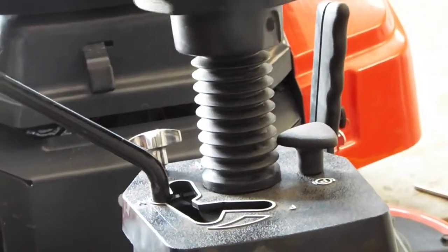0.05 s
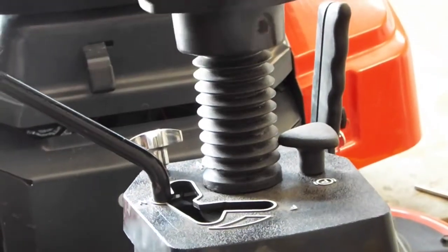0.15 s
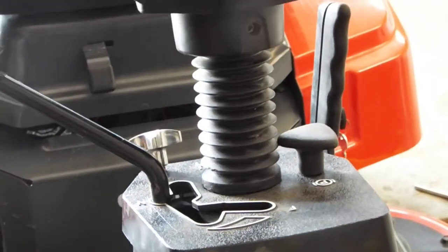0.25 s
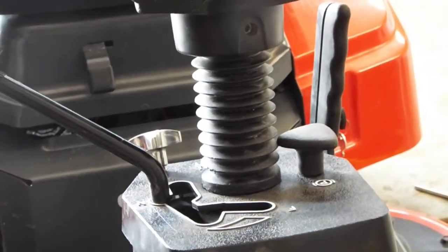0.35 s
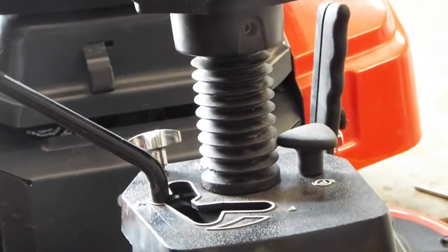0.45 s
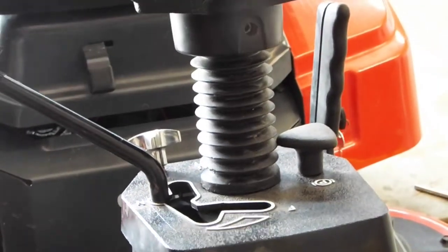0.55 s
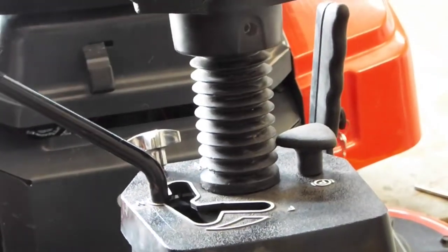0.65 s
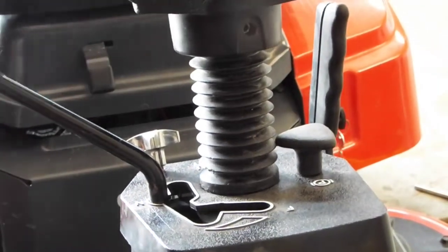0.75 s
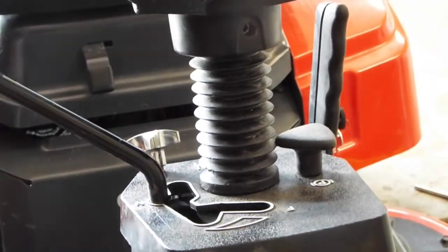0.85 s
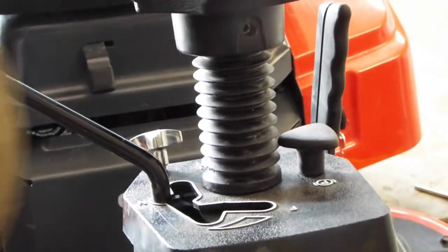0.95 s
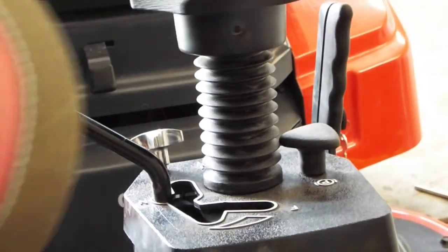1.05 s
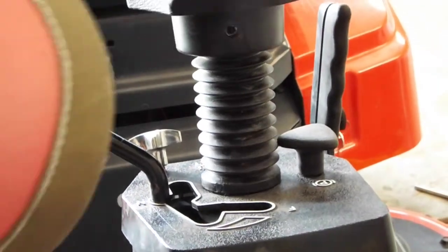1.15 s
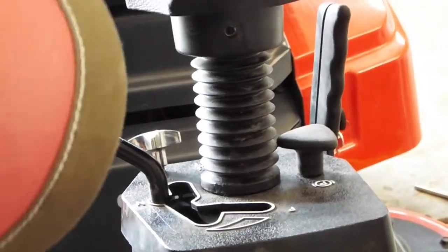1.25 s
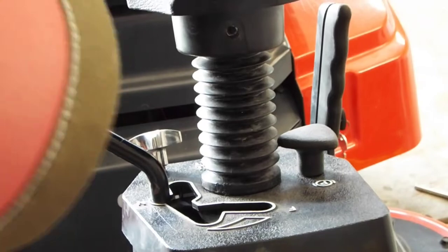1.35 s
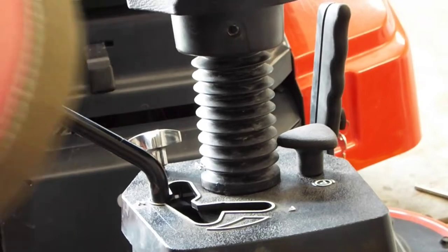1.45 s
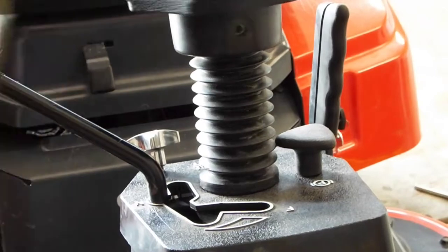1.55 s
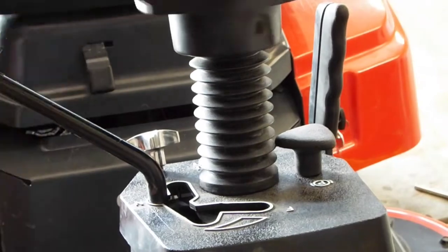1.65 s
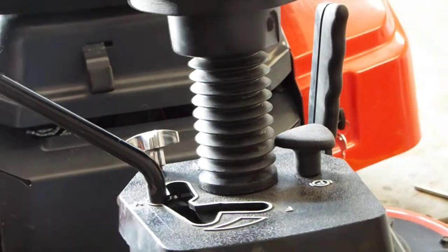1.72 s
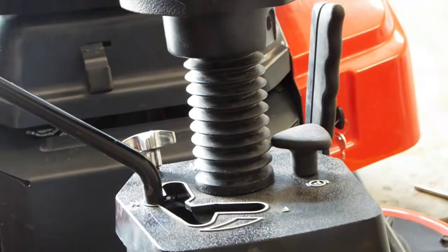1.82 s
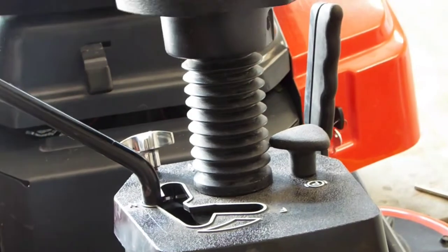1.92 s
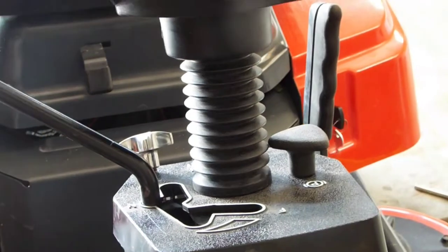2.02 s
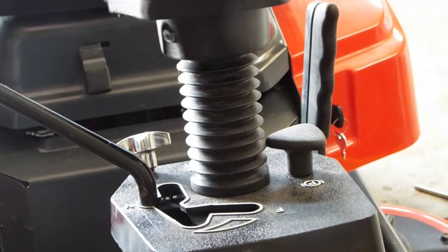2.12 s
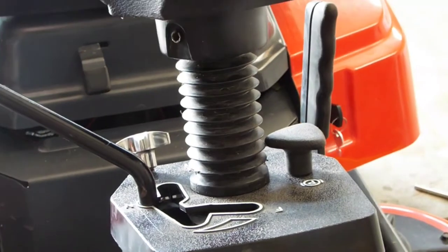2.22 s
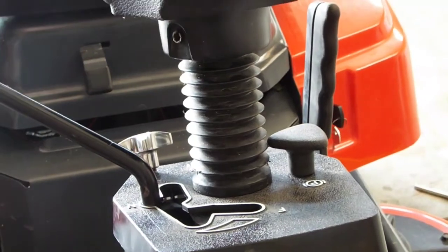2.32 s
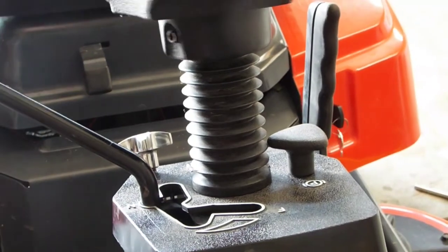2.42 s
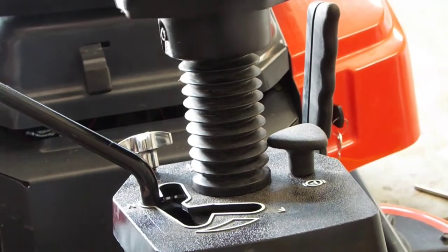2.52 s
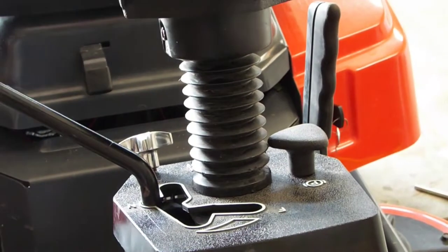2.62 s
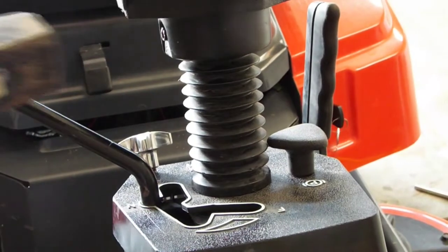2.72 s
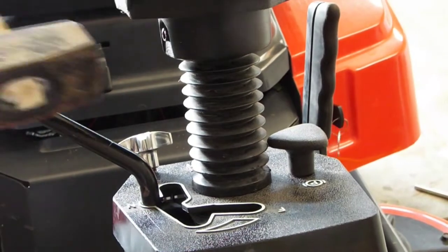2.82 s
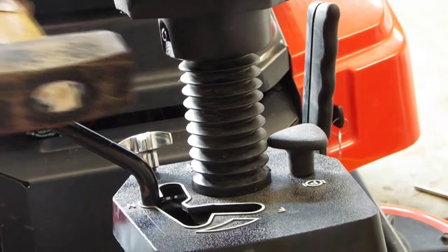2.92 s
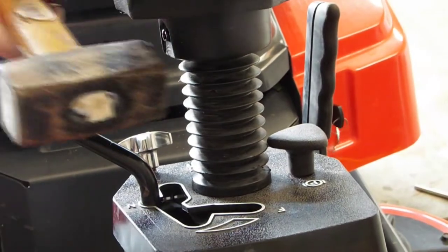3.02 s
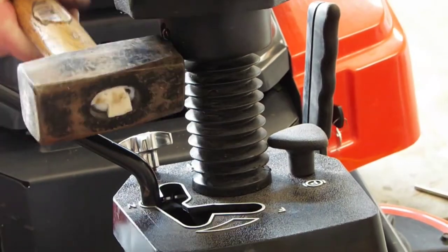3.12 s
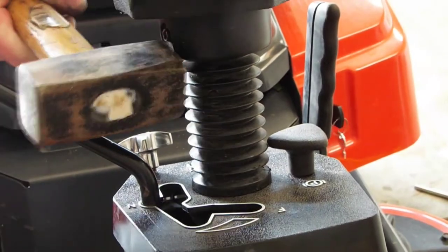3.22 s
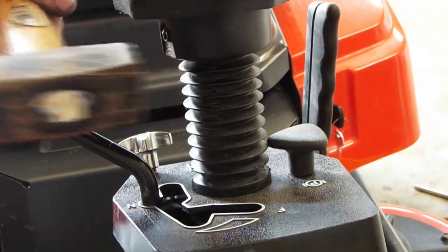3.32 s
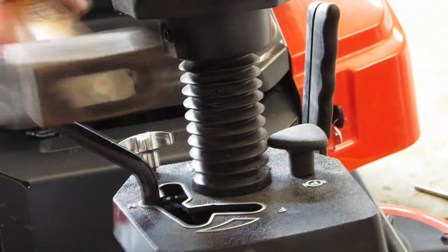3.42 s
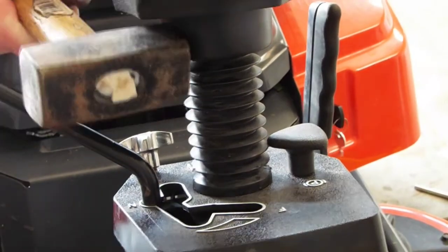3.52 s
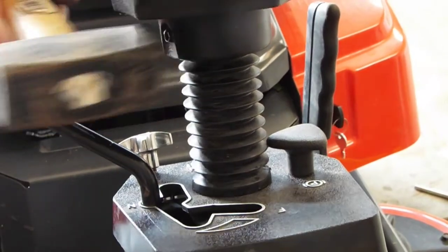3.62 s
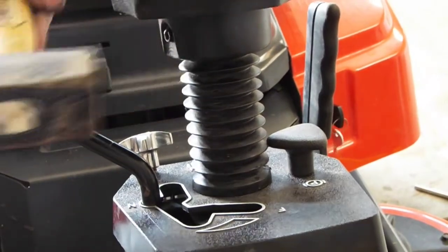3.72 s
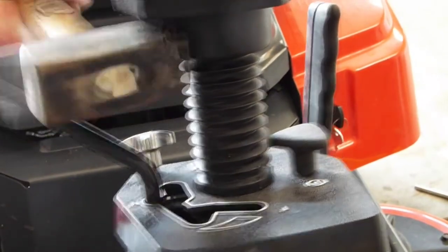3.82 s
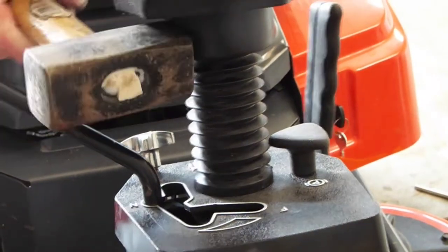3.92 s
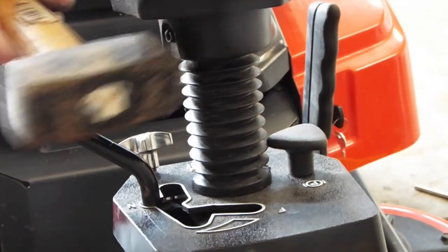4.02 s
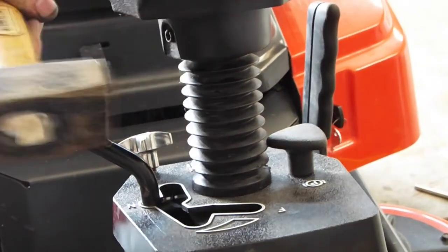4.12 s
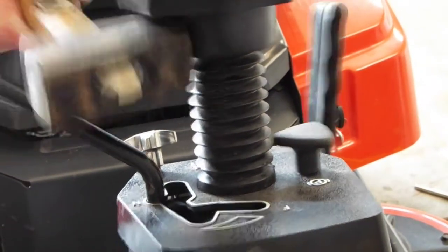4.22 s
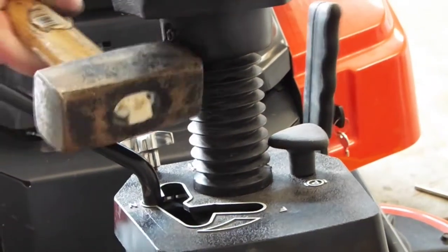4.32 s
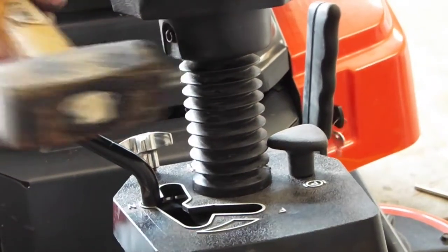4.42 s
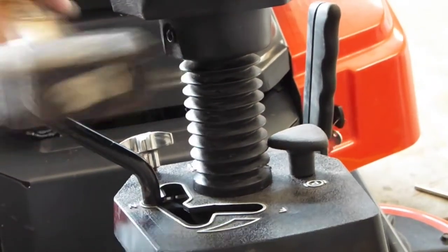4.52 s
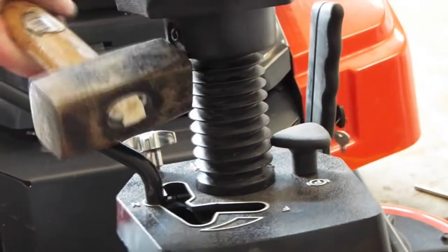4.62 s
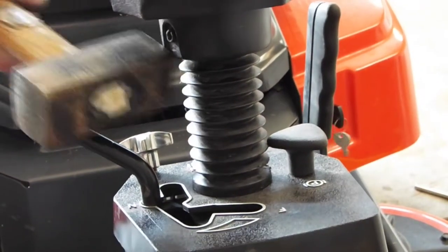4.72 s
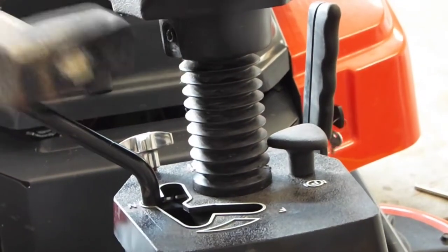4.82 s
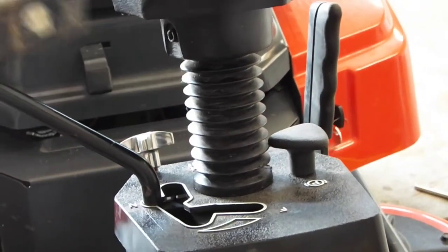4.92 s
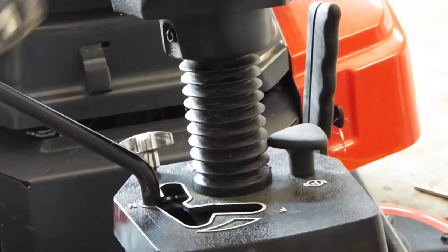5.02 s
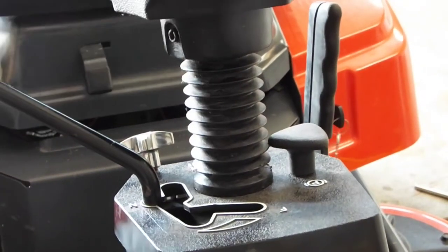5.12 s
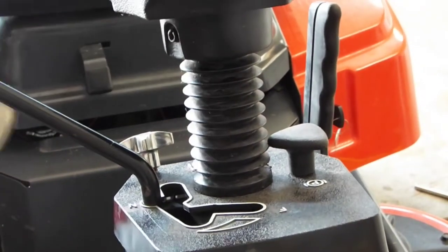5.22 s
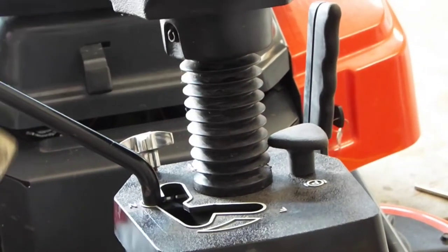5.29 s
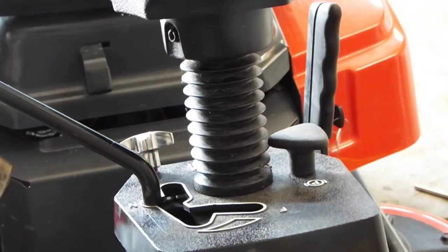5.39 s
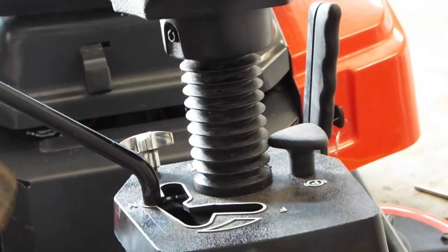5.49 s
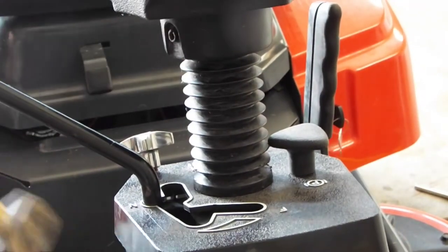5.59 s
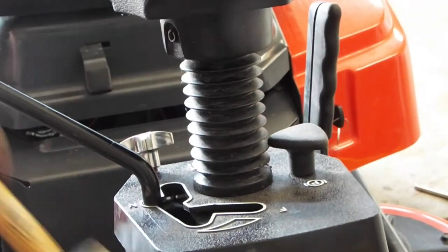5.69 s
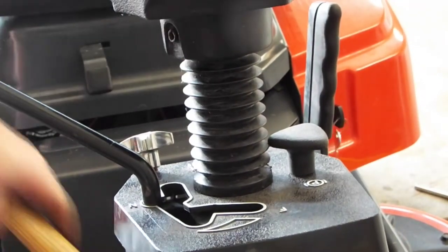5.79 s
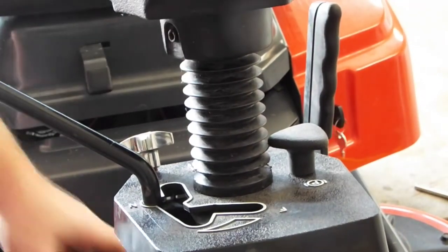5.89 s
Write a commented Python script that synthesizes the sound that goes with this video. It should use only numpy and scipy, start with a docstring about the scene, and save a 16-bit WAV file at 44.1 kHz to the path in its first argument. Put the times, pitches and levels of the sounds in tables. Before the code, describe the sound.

Quiet scraping, dull knocks and light metal clinks come from a machine shaft being turned into place. After one lighter tap, a hammer hits a steel pin four times in quick, regular succession, each sharp clang distorting the close microphone before the garage's echo swells back. The hammer bounces once more and is put away with a soft rustle while a far bird chirps faintly.

```python
"""In a bare, echoing garage, a machine's upright shaft is turned into place: friction hisses, the
shaft knocks against its stops and its loose collar clinks. A hammer is picked up and gives one trial tap
to a steel pin in the collar. Four hard blows drive the pin through, each exciting the modes of hammer,
pin and frame and overloading the close microphone, whose limiter ducks and lets the room's ring swell
back. The hammer rebounds once and is put away while a far bird chirps faintly."""
import sys
import numpy as np
from scipy import signal
from scipy.fft import rfft, irfft, next_fast_len
from scipy.io import wavfile

SR = 44100
rng = np.random.default_rng(int(sys.argv[2]) if len(sys.argv) > 2 else 0)


def wav_record(signal):
    """Record a signal, one row per channel, as 16-bit PCM in the file named by sys.argv[1]."""
    frames = np.transpose(np.atleast_2d(signal))
    bounded = np.clip(frames, -1, 1)
    # unit amplitude maps onto the largest positive 16-bit level
    quanta = np.round(bounded * 32767).astype(np.int16)
    wavfile.write(sys.argv[1], SR, quanta)


N = 262395
TIME = np.arange(N) / SR
CUTOFF_HZ = 15500


def from_db(db):
    """Amplitude ratio of a level in decibels."""
    return 10 ** (np.asarray(db) / 20)


def at_hz(points, hz):
    """Interpolation of a table along log frequency."""
    f, value = np.transpose(points)
    return np.interp(np.log(np.maximum(hz, 1)), np.log(f), value)


def add(track, s, sound):
    """Superposition: a sound joins the track at s seconds."""
    at = int(s * SR)
    track[..., at:at + sound.shape[-1]] += sound[..., :N - at]


def coloured(x, spectrum, keep_power=True):
    """Minimum-phase filtering: folding the cepstrum gives a causal response with the given spectrum."""
    size = 2 * next_fast_len(x.shape[-1] // 2 + 4096)
    gain = from_db(at_hz(spectrum, np.arange(size // 2 + 1) * SR / size))
    if keep_power:
        gain = gain / np.sqrt(np.mean(gain ** 2))
    cepstrum = irfft(np.log(gain))[:size // 2]
    cepstrum[1:] *= 2
    return irfft(rfft(x, size) * np.exp(rfft(cepstrum, size)))[..., :x.shape[-1]]


def soften(x, cut_hz):
    """Low-pass filtering, as in an impact: a longer contact passes less treble."""
    return signal.sosfilt(signal.butter(2, min(cut_hz, .45 * SR), fs=SR, output="sos"), x + 1e-18)


def ring(modes, spread_db, detune=0):
    """Free vibration: damped modes share unit energy a little differently at every strike."""
    t, out = TIME[:SR], 0
    for k, (hz, db, t60) in enumerate(modes):
        luck, bend = rng.standard_normal(2)
        fade = from_db(db + spread_db * luck - np.minimum(60 * t / t60, 200)) / np.sqrt(t60)
        out = out + (-1) ** k * fade * np.sin(2 * np.pi * hz * (1 + detune * bend) * t)
    return out / np.linalg.norm(out)


def contact(rattle_db, rattle_s):
    """Impulsive excitation of unit energy: a click, then the brief chatter of loose parts."""
    chatter = rng.standard_normal(SR) * np.exp(-np.minimum(TIME[:SR] / rattle_s, 20))
    out = from_db(rattle_db) * chatter / np.linalg.norm(chatter)
    out[0] += 1
    return out / np.linalg.norm(out)


def stereo_noise(count, width):
    """Spatial coherence: noise at two close ports is alike in the bass and parts in the treble."""
    mid, side = rng.standard_normal((2, count))
    return mid + coloured(side, width, keep_power=False) * np.array([[1], [-1]])


def air():
    """Ambient noise: a quiet, steady rumble of air."""
    # Each row: frequency in Hz, level in dB.
    spectrum = [(12, -26), (20, 4.5), (49, -6.5), (93, -0.5), (145, -9), (197, -10.5), (227, -14),
                (496, -18), (539, -19), (655, -15.5), (1840, -26.5), (3600, -31.5), (4140, -29),
                (5170, -34), (15800, -41.5)]
    # Each row: frequency in Hz, side against mid in dB.
    width = [(60, -14.5), (110, -14), (200, -13.5), (380, -10), (700, -14), (1290, -14.5), (2380, -8.5),
             (4400, -5.5), (8120, -2), (15000, -4)]
    return from_db(-47) * coloured(stereo_noise(N, width), spectrum)


def garage(build_s):
    """Diffuse reverberation: reflections off hard walls build up, then each band dies at its own rate."""
    # Each row: frequency in Hz, reverberation time in seconds.
    decay_times = [(100, 0.59), (260, 0.78), (700, 0.6), (1800, 0.66), (4800, 0.66), (8000, 0.62),
                   (12000, 0.3), (16000, 0.42)]
    # Each row: frequency in Hz, side against mid in dB.
    width = [(30, -24.5), (60, -12.5), (130, -43), (350, -61), (700, -45.5), (1400, -24), (2800, -17.5),
             (5600, -12), (10000, -6), (15000, -5.5)]
    size = 3 * SR // 2
    t, hz = TIME[:size], np.arange(size // 2 + 1) * SR / size
    noise = rfft(stereo_noise(size, width))
    centres = np.geomspace(100, CUTOFF_HZ, 12)
    echo = 0
    for centre, only in zip(centres, np.eye(len(centres))):
        band = irfft(noise * at_hz(np.c_[centres, only], hz), size)
        echo = echo + band * from_db(-60 * t / at_hz(decay_times, centre))
    echo = echo * (1 - np.exp(-t / build_s))
    return echo / np.linalg.norm(echo[0])


def echoed(sound):
    """Convolution with the garage's impulse response; each call takes other paths between the walls."""
    return signal.fftconvolve(sound[None], garage(build_s=0.0025), axes=1)[:, :N]


def bird(waver_hz):
    """Frequency modulation: the thin notes of a far bird waver as they fall."""
    # Each row: start and length in seconds, first and last pitch in Hz, level in dB.
    notes = [(5.08, 0.22, 4450, 4300, -58), (5.24, 0.22, 4260, 3990, -58),
             (5.475, 0.017, 2710, 2640, -46.5), (5.85, 0.096, 3170, 2990, -53)]
    out = np.zeros(N)
    for s, length, start_hz, end_hz, db in notes:
        count = int(length * SR)
        waver = soften(rng.standard_normal(SR), cut_hz=134)[:count]
        pitch = np.linspace(start_hz, end_hz, count) + waver_hz * waver / waver.std()
        add(out, s, from_db(db) * np.hanning(count) * np.sin(2 * np.pi * np.cumsum(pitch) / SR))
    return out


def strokes(rows):
    """Gaussian envelopes: each hand movement gathers speed and slows again."""
    return sum(from_db(db) * np.exp(-np.minimum(((TIME - s) / half_s) ** 2 / 2, 20))
               for s, half_s, db in rows)


def slides():
    """Sliding friction: dense tiny slips hiss, and the machine rumbles when its shaft turns."""
    # Each row: middle and half length in seconds, level in dB.
    shaft_turns = [(.01, .15, -49), (.817, 0.044, -55), (1.003, 0.061, -45.5), (1.74, 0.071, -49.5),
                   (2.039, 0.075, -39)]
    hammer_rustles = [(2.818, 0.065, -54.5), (5.492, 0.045, -54), (5.74, .054, -56)]
    # Each row: frequency in Hz, level in dB.
    hiss_spectrum = [(1000, -16), (2000, -1.5), (4000, 3.5), (6300, 2), (7800, -5.5), (10000, -6),
                     (12500, -17.5), (15500, -24)]
    rumble_spectrum = [(70, -4), (220, 2), (600, -6), (1100, -3), (2500, -15), (6000, -40)]
    slips = rng.standard_normal((2, N))
    turning = strokes(shaft_turns)
    hiss = coloured(slips[0] * (turning + strokes(hammer_rustles)), hiss_spectrum)
    rumble = coloured(slips[1] * turning, rumble_spectrum)
    return hiss + from_db(2) * rumble


def clinks():
    """Modal ringing: the loose collar drops against the shaft and sounds briefly."""
    # Each row: start in seconds, level in dB.
    drops = [(1.398, -8), (1.504, -7), (2.344, -5.5)]
    # Each row: frequency in Hz, level in dB, 60 dB decay time in seconds.
    collar_modes = [(1075, 2, .05), (1270, -6, .02), (4370, -11, .005), (5300, -5, .006), (5950, -5, .006),
                    (6820, -5, .008), (8495, -14, .005), (11440, -22, .005)]
    out = np.zeros(N)
    for s, db in drops:
        add(out, s, from_db(db) * ring(collar_modes, spread_db=1.5))
    return out


def knocks():
    """Backlash: the shaft meets its stops and the hollow housing thuds; harder contacts clack more."""
    # Each row: start in seconds, strength in dB, contact cut-off in Hz.
    impacts = [(1.370, -0.5, 550), (1.397, 0.5, 830), (1.503, 1, 2020), (1.635, -7.5, 1210),
               (1.684, 0.5, 327), (2.345, -5.5, 1000), (2.792, -20, 5040), (5.7, -25, 5000)]
    # Each row: frequency in Hz, level in dB.
    thud_spectrum = [(60, -20), (130, -3), (200, 0), (280, 5), (380, 0), (520, 1.5), (800, -3), (1300, 1),
                     (2200, -1.5), (3500, -5.5)]
    clack_spectrum = [(300, -6.5), (1500, -10), (2300, -10), (3200, 5), (4500, -1), (6200, 9), (7800, -22),
                      (10000, -14), (15000, -32)]
    hard_clack_db = 6   # against the thud, for a perfectly hard contact
    out = np.zeros(N)
    for s, db, cut_hz in impacts:
        thud = coloured(soften(contact(rattle_db=5.0, rattle_s=0.004), cut_hz), thud_spectrum)
        clack = coloured(soften(contact(rattle_db=12.0, rattle_s=0.0037), cut_hz), clack_spectrum)
        add(out, s, from_db(db) * (thud / np.linalg.norm(thud) + from_db(hard_clack_db) * clack))
    return out


def crack(length_s, cut_hz, grind_db):
    """Forced vibration: the grinding faces keep hammer head and collar ringing briefly; peak one."""
    # Each row: frequency in Hz, level in dB, 60 dB decay time in seconds.
    head_modes = [(650, -7, .003), (1150, -2, .003), (1850, -1, .004), (2950, 0, .005), (4300, -8, .002),
                  (5900, -8, .003), (9300, -6, .003)]
    count = SR // 20
    grind = rng.standard_normal(count) * np.exp(-np.minimum((TIME[:count] / length_s) ** 4, 40))
    push = from_db(grind_db) * grind
    push[0] += 1
    response = ring(head_modes, spread_db=1, detune=0.029)[:count]
    out = signal.fftconvolve(soften(push, cut_hz), response)
    return out / np.abs(out).max()


def hammer():
    """Impact radiation: a direct crack, a clang into the room, and the machine's frame ringing on."""
    # A trial tap, four hard blows, a rebound; at the last hard blow the pin gives and shakes the frame
    # less. Each row: start in seconds, strength in dB, grind time in seconds, contact cut-off in Hz,
    # frame shake in dB, one mode's frequency in Hz and level in dB. Shake and mode are against the clang.
    blows = [(3.0615, 17, 0.0075, 5840, -1.5, 2940, -11), (3.4014, 32.5, 0.0012, 6040, -5, 2050, -12.5),
             (3.790, 35.5, 0.0021, 13600, -5, 12400, -43), (4.172, 36, 0.01, 9650, -3, 1744, -17),
             (4.509, 34.5, 0.0024, 9500, -11, 2980, -20.5), (4.750, 16, 0.029, 4300, -3.5, 10800, -35)]
    # Each row: frequency in Hz, level in dB, 60 dB decay time in seconds.
    pin_modes = [(1660, -5, .012), (2030, -7, .025), (2810, -4, .025), (3050, -4, .02), (3384, -8, .03),
                 (4250, -6, .015), (6830, -14, .04), (9200, -12, .01), (10850, -21, .05)]   # pin and shaft, damped by the collar
    frame_modes = [(145.6, -1, 0.47), (215.6, 12.5, 0.28), (237.3, 4.5, 0.53), (293.7, 6, 0.34),
                   (383.4, 2, 0.38), (524.5, -2, 0.63), (690, 0.5, 0.46), (870, 1.5, 0.52),
                   (969, 1.5, 0.52), (1172, 5.5, 0.51), (1175, 2.5, 0.36), (1355, -0.5, 0.18),
                   (1407, -12, 0.13), (1590, -6, 0.26)]   # frame and covers
    # Each row: frequency in Hz, level in dB.
    clang_spectrum = [(21, -52), (35, -21), (95, -14), (136, -6.5), (171, -9.5), (226, -4.5), (341, -5.5),
                      (527, -2.5), (630, -4.5), (1660, -1), (2570, -6), (4750, -6.5), (7920, -19.5),
                      (9720, -18.5), (15800, -43.5)]
    brightness = [(1000, -2.0), (6000, -2), (9000, 1.0), (14000, 4.5)]   # steel radiates treble well
    frame_spread_s = 0.061   # time the shock takes to spread through the frame
    reach = 1 - np.exp(-TIME[:SR] / frame_spread_s)
    out = np.zeros((2, N))
    for s, db, grind_s, cut_hz, shake_db, mode_hz, mode_db in blows:
        clang = coloured(contact(rattle_db=-9.5, rattle_s=0.009), clang_spectrum)
        pin = from_db(-16) * ring(pin_modes, spread_db=4)
        clang = soften(coloured(clang, brightness, keep_power=False) + pin, cut_hz)
        # Where the hammer lands decides which mode sings out.
        ping = ring([(mode_hz, 0, .015)], spread_db=0)
        add(out, s, from_db(db) * echoed(clang + from_db(mode_db) * ping))
        add(out, s, from_db(db + shake_db) * reach * ring(frame_modes, spread_db=1.5, detune=0.0029))
        # A longer grind spreads the push: the peak loses 6 dB for each doubling from 1 ms.
        crack_db = 19.5 - 6 * np.log2(1000 * grind_s)
        add(out, s, from_db(crack_db) * crack(grind_s, cut_hz, grind_db=-12.0))
    return out


def scene():
    """Direct and reverberant fields add at the microphone, over the rumble of the air."""
    blows = hammer()
    handling = knocks() + clinks()
    direct = from_db(-5.5) * handling
    reverberant = echoed(handling + slides() + bird(waver_hz=97.7))
    return air() + reverberant + direct + blows


def limiter(x, threshold_db, release_db_per_s, attack_s):
    """Automatic gain control: the gain falls quickly after a peak and climbs back steadily."""
    over_db = np.maximum(20 * np.log10(np.abs(x).max(axis=0) + 1e-9) - threshold_db, 0)
    held_db = np.maximum.accumulate(over_db + release_db_per_s * TIME) - release_db_per_s * TIME
    pole = np.exp(-1 / (attack_s * SR))
    return x * from_db(-signal.lfilter([1 - pole], [1, -pole], held_db))


def record(dry):
    """Saturation: the first cycles of a blow outrun the limiter and clip; a low-pass cuts the top."""
    limited = limiter(dry, threshold_db=1.03, release_db_per_s=190.0, attack_s=0.0023)
    clipped = .97 * limited / (1 + limited ** 8) ** (1 / 8)
    return signal.sosfilt(signal.butter(32, CUTOFF_HZ, fs=SR, output="sos"), clipped)


dry = scene()
out = record(dry)
wav_record(out)
```